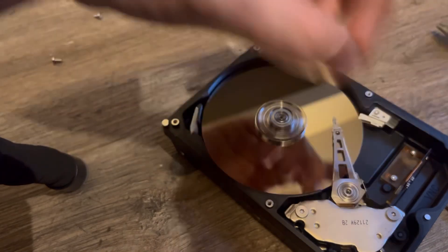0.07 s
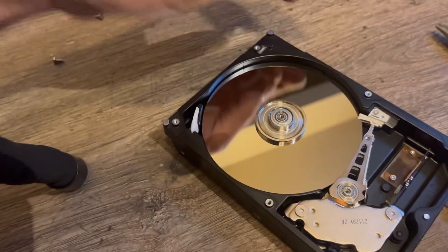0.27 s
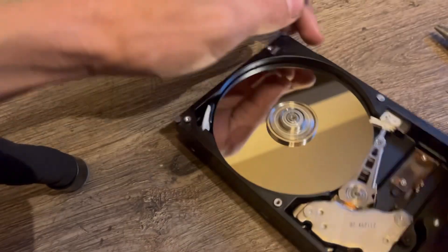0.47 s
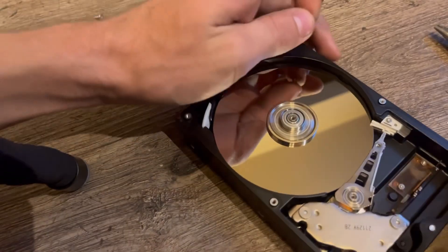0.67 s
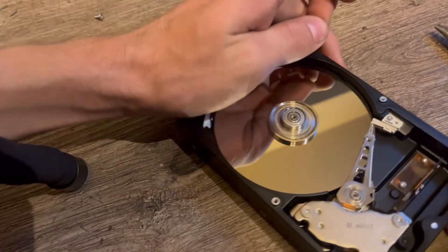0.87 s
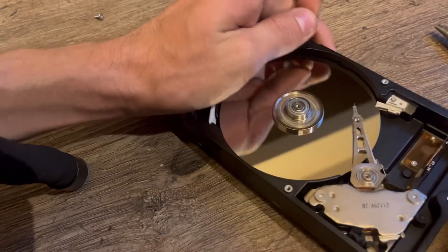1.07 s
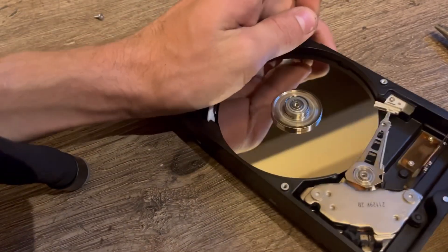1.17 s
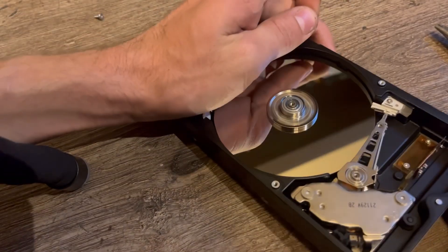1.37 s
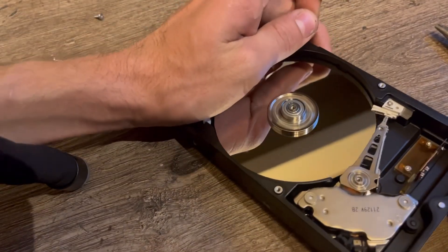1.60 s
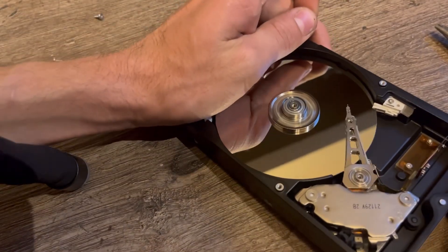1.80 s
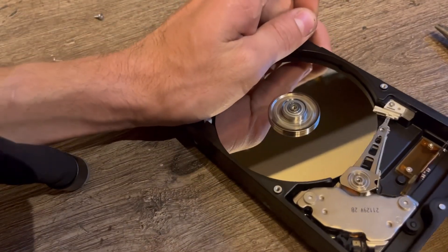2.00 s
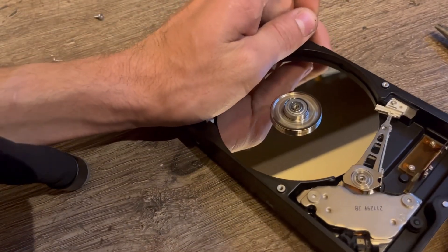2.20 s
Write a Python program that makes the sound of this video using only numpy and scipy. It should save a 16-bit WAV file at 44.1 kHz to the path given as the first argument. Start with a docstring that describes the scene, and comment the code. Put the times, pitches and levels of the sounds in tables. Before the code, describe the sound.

A failing opened hard drive repeats a short hum, sharp metallic tick, rising electronic whine and dry rasp over steady platter hiss; a hand thuds and shuffles the case on a wooden floor, close stereo microphone, small room.

```python
"""An opened hard drive spins on a wooden floor, its platter rushing under faint bearing tones throughout.
About every 0.88 s it retries: the head arm hums across the platter (two close resonances and a third),
ticks against its stop (dispersed pulses and case modes), its coil whines (swelling harmonics), and it
rasps over the parking ramp (grainy noise). From 0.33 s a hand grips the case: it knocks and shuffles on
the boards (low pulses, resonant noise), fingertips brush the metal, and one taps the case at 1.52 s."""
import sys
import numpy as np
from scipy import signal
from scipy.fft import rfft, irfft, next_fast_len
from scipy.io import wavfile
from scipy.ndimage import map_coordinates

SR = 44100
rng = np.random.default_rng(int(sys.argv[2]) if len(sys.argv) > 2 else 0)


def int16_out(signal):
    """Quantize to a 16-bit WAV file."""
    q = np.round(np.clip(np.atleast_2d(signal).T, -1, 1) * 32767)
    wavfile.write(sys.argv[1], SR, q.astype(np.int16))


N = 99225  # samples, 2.25 s


def amp(db):
    """Decibels to gain."""
    return 10 ** (np.asarray(db) / 20)


def unit(x):
    """Scale to rms 1."""
    return x / np.sqrt(np.mean(x ** 2) + 1e-20)


def along(points, hz):
    """Read a curve of (Hz, value) points on a log frequency axis."""
    f, v = np.transpose(points)
    return np.interp(np.log(hz + 1), np.log(f + 1), v)


def since(s):
    """Seconds since s, zero before it."""
    return np.maximum(np.arange(N) / SR - s, 0)


def wobble(rate):
    """A smooth random curve with rate knots a second."""
    knots = rng.standard_normal(int(N * rate / SR) + 4)
    return map_coordinates(knots, [np.arange(N) * rate / SR])


def filtered(x, response):
    """Filter x by a complex response of frequency, padded against wrap-around."""
    m = next_fast_len(N + 8192)
    return irfft(rfft(x, m) * response(np.fft.rfftfreq(m, 1 / SR)), m)[..., :N]


def pan(db):
    """Left and right gains for a left-right level difference."""
    return amp(np.array([[.5], [-.5]]) * db)


def at_ports(x, phase):
    """A sound reaches the two microphone ports out of step, by radians that vary with frequency."""
    return filtered(x, lambda hz: np.exp(.5j * along(phase, hz) * np.array([[1], [-1]])))


def noise(colour, alike):
    """Coloured stereo noise of rms 1; the mid-side mix sets the likeness of the two sides."""
    def mid_side(hz):
        turn = np.arccos(np.clip(along(alike, hz), -1, 1)) / 2
        return amp(along(colour, hz)) * [np.cos(turn), np.sin(turn)]
    mid, side = filtered(rng.standard_normal((2, N)), mid_side)
    return unit(np.array([mid + side, mid - side]))


def swell(s, length, attack, release):
    """Exponential attack from s, hold, exponential release after length; all in seconds."""
    return (1 - np.exp(-since(s) / attack)) * np.exp(-since(s + length) / release)


def blow(s, colour, lag, stretch=1):
    """A causal pulse at s, each pitch delayed by its lag times stretch; rms 1 over 10 ms."""
    size = 8192
    hz = np.fft.rfftfreq(size, 1 / SR)
    # minimum phase from the cepstrum, then the extra delay summed into phase
    cepstrum = irfft(np.log(amp(along(colour, hz))))[:size // 2]
    phase = 2 * np.pi * np.cumsum(along(lag, hz)) * hz[1] * stretch
    pulse = irfft(np.exp(2 * rfft(cepstrum, size) - 1j * phase))[:size // 2]
    pulse = pulse * np.sqrt(.01 * SR / np.sum(pulse ** 2))
    return np.pad(pulse, (round(s * SR), N))[:N]


def ticks(ring_db=-12, chatter_db=-4, chatter_s=0.0062, tail_db=-17, tail_s=0.027, rebound_db=-5, rebound_s=.0021):
    """The arm strikes its stop, rebounds, chatters for a moment and rings the case."""
    # Each row: strike in seconds, level in dB.
    strikes = [(0.2230, -24.5), (1.1194, -24), (1.9712, -25.5)]
    # Tone of the strike. Each row: frequency in Hz, level in dB.
    colour = [(90, -54.5), (300, -26), (700, -18), (1000, -6), (1220, -22.5), (1550, 9.5), (1950, -15.5),
              (2450, -24.5), (3050, 3), (3700, -27), (4400, -15.5), (5700, -26), (7500, -15), (9000, -16.5),
              (13500, -20), (16000, -35)]
    # Bending waves, treble first. Each row: frequency in Hz, delay in seconds.
    lag = [(500, 0.00501), (1500, 0.00362), (3000, 0.001396), (8000, 0.000783)]
    grit = noise(colour, [(1000, 0.76)])
    sound = 0
    for s, db in strikes:
        strike = blow(s, colour, lag)
        rebound = amp(rebound_db) * blow(s + rebound_s * rng.normal(1, .1), colour, lag)
        chatter = amp(chatter_db) * swell(s, 0.0032, 0.0025, chatter_s)
        tail = amp(tail_db) * swell(s, 0.0044, 0.0047, tail_s)
        sound = sound + amp(db) * (strike + rebound + amp(ring_db) * ring(s) + grit * (chatter + tail))
    return sound


def ring(s):
    """Decaying modes of the arm and case, a little different at each blow and each port."""
    # Each row: frequency in Hz, level in dB, 60 dB decay time in seconds.
    modes = [(317, -14.5, 0.34), (947, -7.5, 0.4), (951, -12, 0.18), (1478, 7, 0.15), (1440, -11, 0.14),
             (1616, 11.5, 0.042), (2734, 0, 0.16), (3020, -7, 0.069), (3060, 0, 0.12), (4630, -12, 0.11)]
    t = since(s)
    sound = 0
    for hz, db, t60 in modes:
        level = amp(db + rng.normal(0, 0.5, (2, 1)) - 60 * t / t60)
        phase = rng.uniform(0, 2 * np.pi) + rng.normal(0, 0.94, (2, 1))
        sound = sound + level * np.sin(2 * np.pi * hz * t + phase)
    return sound * (1 - np.exp(-t / 0.001))


def seeks(rush_db=-8, flutter_db=1.5, rough=.5):
    """The arm sings over the platter: two close, beating resonances, a weaker lower one, a little rush."""
    # Each row: start in seconds, length in seconds, level in dB.
    sweeps = [(0.031, 0.067, -36), (0.929, 0.05, -35.5), (1.776, 0.059, -39)]
    # Resonances of the moving arm. Each row: frequency in Hz, level in dB.
    resonances = [(850, -22), (1540, 1.5), (1662, 1.5)]
    # Tone of the rush. Each row: frequency in Hz, level in dB.
    colour = [(600, -16.5), (850, -23), (1150, -45), (1430, 7), (1540, -3.5), (1600, -52), (1665, 1.5),
              (1800, -5), (2400, -24), (3000, 0.5), (3600, -20), (8000, -11), (15000, -54)]
    tones = 0
    for hz, db in resonances:
        level = amp(db + flutter_db * wobble(63))
        tones = tones + level * np.sin(2 * np.pi * hz * since(0) + rough * wobble(90))
    hum = tones + amp(rush_db) * noise(colour, [(1000, 0.24)])
    return hum * sum(amp(db) * swell(s, length, 0.0023, 0.025) for s, length, db in sweeps)


def whines(linger_db=-16, linger_s=.03):
    """The coil's buzz grows, its low partials last; it is cut off and lingers faintly in the case."""
    # Each row: start in seconds, length in seconds, gain of the high partials in dB, of the low in dB.
    bursts = [(0.383, .061, 1, -5), (1.277, .0595, 0, 0), (2.133, .064, 0, 0)]
    # Each row: multiple of the fundamental, level in dB, left-right difference in dB, radians left leads.
    partials = [(1, -52, -1, -1), (2, -34, -3, -2.2), (3, -50, 5, -.6), (5, -44, -6, -1),
                (6, -53, -2, -1.6), (7, -35, -6, -2.1), (8, -53, -7, -1.5), (9, -49, 0, -.5),
                (11, -52, 0, 1.4), (13, -54, 0, 1.4), (15, -55, 0, 0), (17, -68, 0, 0)]
    fundamental_hz, low_below_hz = 802.2, 3000
    release_s, low_power, high_power = 0.0018, 1.08, 0.59  # a higher power swells later

    def level(s, length, power):
        after = since(s + length)
        growth = np.minimum(since(s) / length, 1) ** power
        return growth * (np.exp(-after / release_s) + amp(linger_db) * np.exp(-after / linger_s))

    high = sum(amp(db) * level(s, length, high_power) for s, length, db, _ in bursts)
    low = sum(amp(db) * level(s, length, low_power) for s, length, _, db in bursts)
    sound = 0
    for k, db, side, lead in partials:
        hz = k * fundamental_hz
        envelope = low if hz < low_below_hz else high
        port_phase = lead * np.array([[.5], [-.5]])
        tone = np.sin(2 * np.pi * (hz * since(0) + rng.random()) + port_phase)
        sound = sound + np.sqrt(2) * amp(db) * pan(side) * envelope * tone  # root 2: dB are rms
    return sound


def rasps(grain_db=3):
    """The heads scrape over the ramp in rapid slips, then the case rings on."""
    # Each row: start in seconds, length in seconds, scrape level in dB, ring level in dB.
    scrapes = [(0.7280, .015, -24, -35.5), (1.6206, .011, -28.5, -37)]
    # Tone of the scrape. Each row: frequency in Hz, level in dB.
    colour = [(700, -67), (950, 4.5), (1200, -35), (1550, 3), (1900, -22), (2400, -14), (2950, 1.5),
              (3400, -13.5), (3900, -10.5), (5000, -15.5), (6600, -8.5), (8500, -23), (12500, -26.5),
              (14500, -38)]
    slips = unit(noise(colour, [(1000, 0.68)]) * amp(grain_db * wobble(900)))
    sound = 0
    for s, length, db, ring_db in scrapes:
        scrape = amp(db) * slips * swell(s, length, 0.0016, 0.0047)
        sound = sound + scrape + amp(ring_db) * ring(s + length / 2)
    return sound


def hand():
    """The gripped case knocks and shuffles on the boards; fingertips brush and tap it over a low rumble."""
    # Low rumble of the hand. Each row: time in seconds, level in dB.
    rumble_level = [(0, -70), (0.3, -61.5), (0.378, -37), (0.6, -43.5), (0.848, -51.5), (1.15, -54),
                    (1.3, -60), (1.5, -53.5), (1.8, -62.5), (2.0, -64), (2.25, -66.5)]
    # Tone of the rumble. Each row: frequency in Hz, level in dB.
    rumble_colour = [(25, -47), (48, -5), (61, 7), (80, -2), (130, -6), (200, -3), (320, -1), (500, -9),
                     (900, -24), (3000, -37)]
    # Tone of the wood. Each row: frequency in Hz, level in dB.
    wood_colour = [(40, -17), (100, -12), (180, -7.5), (240, -8), (340, 3.5), (480, -13), (760, -5.5),
                   (1100, -21.5), (2000, -23), (4000, -48), (9000, -76)]
    # Phase at the ports. Each row: frequency in Hz, radians left leads.
    floor_phase = [(30, -1.2), (150, -0.45), (330, -1), (730, -1.44), (1400, -1), (2200, -4.5),
                   (3100, -5.5), (5500, -9.5), (7300, -12), (11500, -9.5)]
    rumble = amp(np.interp(since(0), *np.transpose(rumble_level))) * noise(rumble_colour, [(100, 1.0)])
    rubbing = shuffles(noise(wood_colour, [(500, 1.0)]))
    sound = knocks(wood_colour) + rubbing + brushing() + tap() + rumble
    return pan(-1.1) * at_ports(sound, floor_phase)


def knocks(wood_colour, rattle_s=0.016, rub_db=4, crack_tail_db=-18):
    """Case on floor: a dispersed thud, a bright crack and a grainy rattle; the floorboard swings on."""
    # Each row: start in seconds, thud in dB, crack in dB, rattle in dB, stretch of the thud's delays.
    hits = [(0.3415, -13, -17, -21.5, .75), (0.3597, -16, -48, -35.5, .4),
            (0.4720, -14, -19.5, -27.5, 0.99), (0.5571, -16.5, -32, -24.5, 0.9),
            (0.6910, -30, -48, -35, 0.61)]
    # Tone of the thud. Each row: frequency in Hz, level in dB.
    thud_colour = [(60, -36), (180, -20), (260, -1), (340, 5), (500, -18.5), (735, 4), (950, -11.5),
                   (1150, -28.5), (1450, -20.5), (2000, -29), (3200, -24), (6000, -67)]
    # Delays of the thud before stretching. Each row: frequency in Hz, delay in seconds.
    thud_lag = [(200, 0.01066), (330, 0.0082), (500, 0.0045), (750, 0.0022), (1500, 0.00021)]
    # Tone of the crack. Each row: frequency in Hz, level in dB.
    crack_colour = [(500, -5), (1200, 9.5), (2000, 6), (3100, 11.5), (4000, 6), (5500, 2.5), (7000, 3),
                    (9000, 6.5), (11200, 9), (13000, 2.5), (16000, -24)]
    thuds = cracks = rattles = 0
    for s, thud_db, crack_db, rattle_db, stretch in hits:
        thuds = thuds + amp(thud_db) * blow(s, thud_colour, thud_lag, stretch)
        snap = swell(s, 0.0024, 0.00045, 0.002)
        crack_tail = amp(crack_tail_db) * swell(s, 0.0024, 0.0014, 0.035)
        cracks = cracks + amp(crack_db) * (snap + crack_tail)
        rattles = rattles + amp(rattle_db) * swell(s, 0.027, 0.0043, rattle_s)
    wood = unit(noise(wood_colour, [(500, 0.97)]) * amp(rub_db * wobble(140)))
    board = floorboard(hits[0][0])
    return thuds + cracks * noise(crack_colour, [(3000, 0.41)]) + wood * rattles + board


def floorboard(s, hz=57, db=-28, t60=1.15, rise_s=0.058):
    """The floorboard swings after the first knock: one slow-rising, unsteady low mode."""
    t = since(s)
    level = amp(db - 60 * t / t60) * (1 - np.exp(-t / rise_s))
    return level * np.sin(2 * np.pi * hz * t + 0.58 * wobble(13.8))


def shuffles(wood, skirt_db=-15, width_octaves=0.83):
    """Each shift of the case rubs the boards around one resonance."""
    # Each row: start in seconds, length in seconds, level in dB, centre in Hz.
    shifts = [(0.333, 0.011, -26, 540), (0.588, 0.014, -29, 297), (0.63, 0.091, -56, 258),
              (0.663, 0.07, -37.5, 347), (0.752, 0.036, -56.5, 300), (0.838, 0.007, -38.5, 302),
              (1.088, 0.064, -46, 270), (1.525, 0.022, -37.5, 382), (1.685, 0.0076, -38.5, 302),
              (1.959, 0.028, -39.5, 680), (2.077, 0.0079, -51, 194), (2.241, .01, -46, 700)]

    def rub(centre):
        def resonance(hz):
            return amp(skirt_db) + np.exp(-(np.log2((hz + 1) / centre) / width_octaves) ** 2)
        return unit(filtered(wood, resonance))

    return sum(amp(db) * swell(s, length, 0.002, 0.017) * rub(centre) for s, length, db, centre in shifts)


def brushing():
    """Fingertips brush the metal: short swells of bright noise."""
    # Each row: start in seconds, length in seconds, level in dB.
    strokes = [(0.804, 0.012, -40), (1.677, 0.0095, -43.5)]
    # Tone of the metal. Each row: frequency in Hz, level in dB.
    colour = [(1500, -21), (4000, -23), (8000, 2), (12500, -10), (14000, -2), (16000, -16)]
    envelope = sum(amp(db) * swell(s, length, 0.0037, 0.012) for s, length, db in strokes)
    return envelope * noise(colour, [(8000, .3)])


def tap(s=1.5213, db=-27):
    """A fingertip taps the case: one dull pulse, its low notes late."""
    # Each row: frequency in Hz, level in dB.
    colour = [(80, -24), (200, -9), (400, -4.5), (650, 1), (900, -10), (1300, -3), (2000, -8.5),
              (2600, -17), (3600, -31), (8000, -47), (15000, -58)]
    # Each row: frequency in Hz, delay in seconds.
    lag = [(250, 0.00456), (600, 0.0016), (1500, 0.00028)]
    return amp(db) * blow(s, colour, lag)


def spin(air_db=-44.5, waver_db=3.0):
    """Air rushes round the platter under faint, wavering bearing tones."""
    # Rush of the platter. Each row: frequency in Hz, level in dB.
    colour = [(25, -52), (60, -15), (130, -20.5), (320, -15), (600, -8.5), (900, -4.5), (1200, 0),
              (1550, 5), (1950, -4.5), (2400, -2), (2900, 3), (3500, -5.5), (4350, 0.5), (5100, -10),
              (6400, -8), (7500, -1), (8700, -15), (11000, -16), (12500, -11.5), (13700, -23.5),
              (14600, -42)]
    # Each row: frequency in Hz, left-right likeness from -1 to 1.
    alike = [(100, 1), (600, 0.78), (1500, -0.41), (3000, .45), (5500, -0.2), (8000, 0.32), (14000, 0.059)]
    # Each row: frequency in Hz, left-right difference in dB.
    balance = [(700, -2.5), (1300, -2.5), (2400, -1), (4400, -8.5), (8000, 0.5), (15000, 0)]
    # Bearing tones. Each row: frequency in Hz, level in dB.
    bearing = [(2800, -60.5), (2945, -67), (4205, -66.5), (4287, -57), (4323, -70.5), (4443, -61),
               (7318, -60.5)]
    air = filtered(noise(colour, alike), lambda hz: pan(along(balance, hz)))
    tones = 0
    for hz, db in bearing:
        level = amp(db + waver_db * wobble(14))
        tones = tones + level * np.sin(2 * np.pi * hz * since(0) + 0.31 * wobble(24.55))
    return amp(air_db + 0.67 * wobble(11.55)) * air + pan(-1) * tones


def room(x, t60):
    """A short, diffuse answer from the room: convolution with decaying noise."""
    t = np.arange(SR // 3) / SR
    tail = rng.standard_normal((2, len(t))) * amp(-60 * t / t60) * (1 - np.exp(-t / 0.012))
    return signal.fftconvolve(x, tail / np.linalg.norm(tail[0]), axes=1)[:, :N]


def scene(drive_room_db=-16, hand_room_db=-22, whine_room_db=-21):
    """The head mechanism a little to the right, the hand, the platter and the room."""
    # Phase at the ports. Each row: frequency in Hz, radians left leads.
    drive_phase = [(20, 2), (900, 1.04), (1550, -2), (2400, -6.5), (3100, -6), (4700, -7), (5600, -9),
                   (7300, -6.5), (16000, -4.5)]
    arm = at_ports(pan(-1.2) * (ticks() + rasps() + seeks()), drive_phase)
    coil = whines()
    grip = hand()
    to_room = amp(drive_room_db) * arm + amp(whine_room_db) * coil + amp(hand_room_db) * grip
    return arm + coil + grip + spin() + room(to_room, t60=0.22)


def record(dry, top_hz=16400):
    """The microphone has a deep notch near 10 kHz and keeps nothing above its band limit."""
    # Each row: frequency in Hz, level in dB.
    colour = [(8800, -1), (9300, -10), (9850, -45), (10400, -7), (11000, -1), (13700, 0), (14600, -15),
              (16000, -12)]
    return filtered(dry, lambda hz: amp(along(colour, hz)) * (hz < top_hz))


dry = scene()
out = record(dry)
int16_out(out)
```